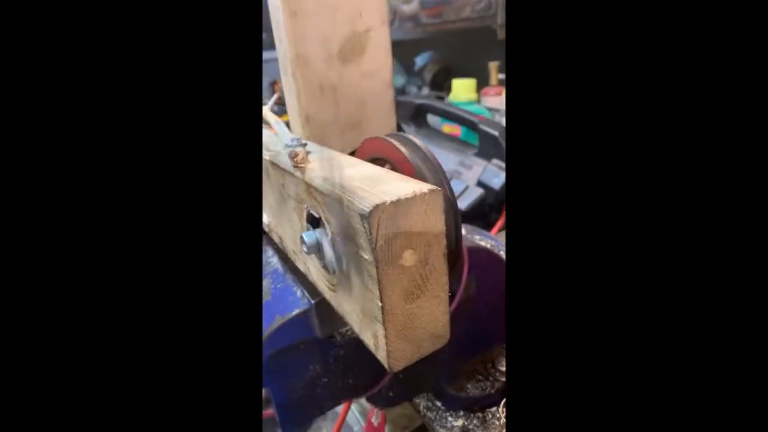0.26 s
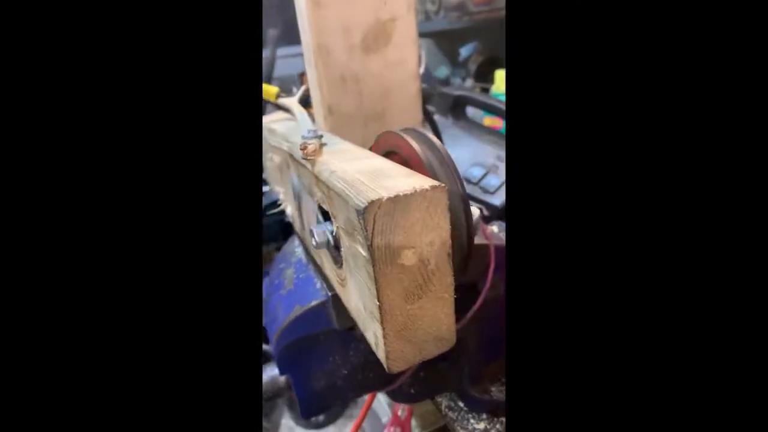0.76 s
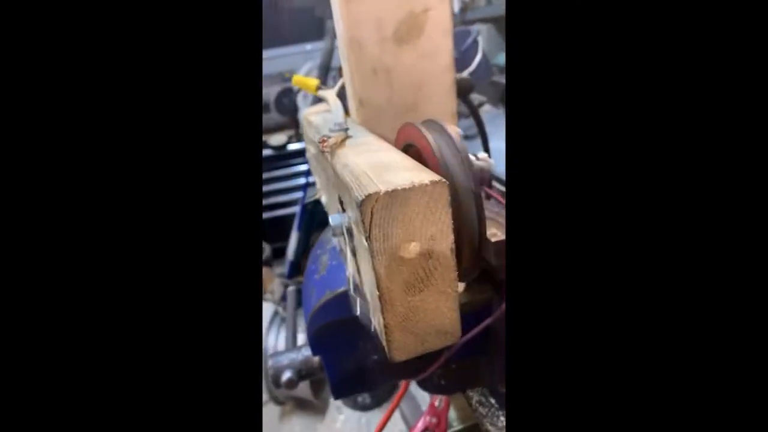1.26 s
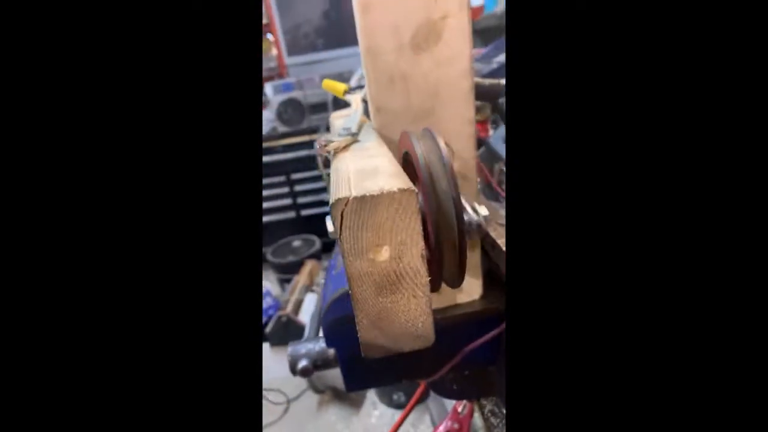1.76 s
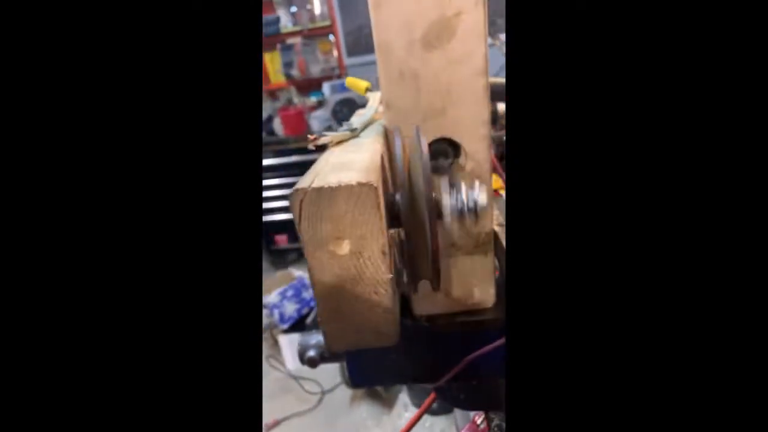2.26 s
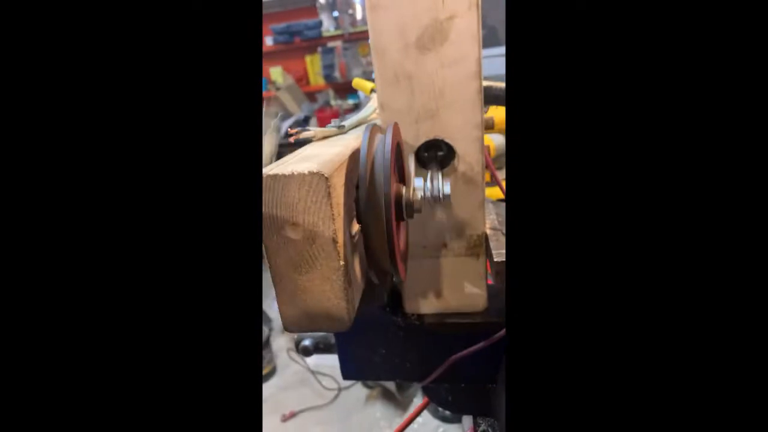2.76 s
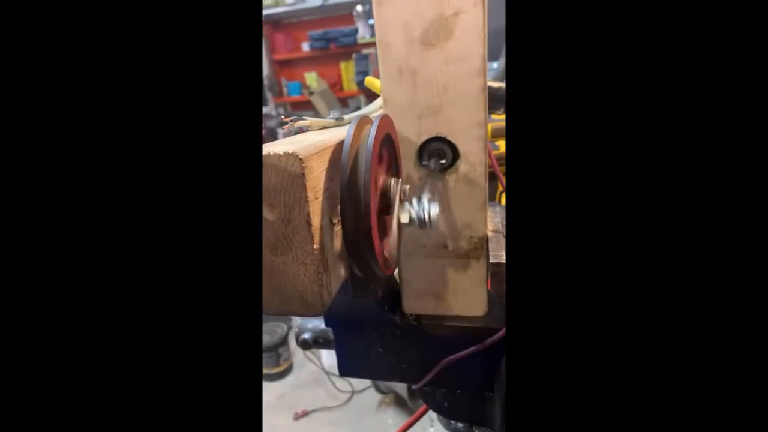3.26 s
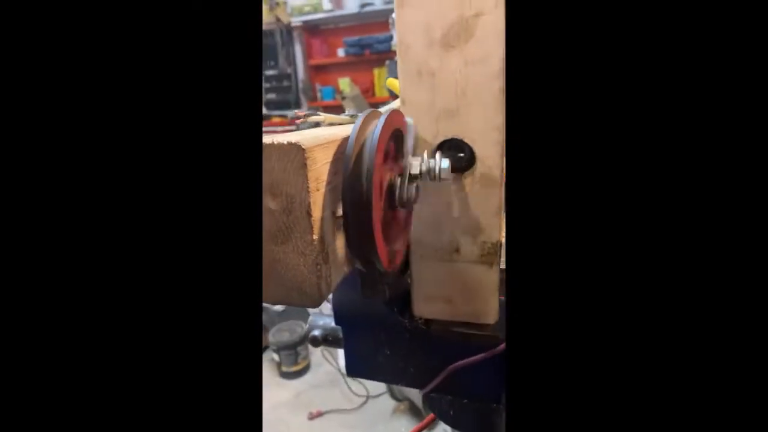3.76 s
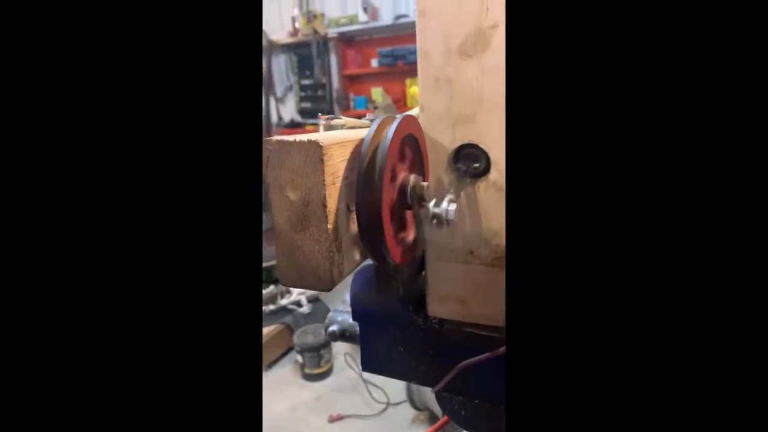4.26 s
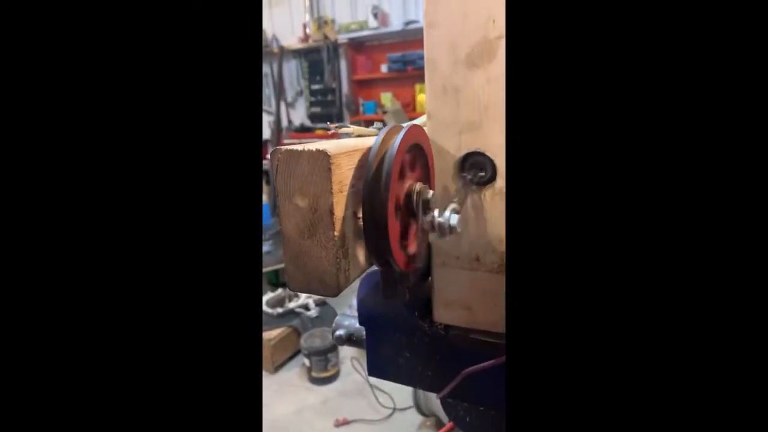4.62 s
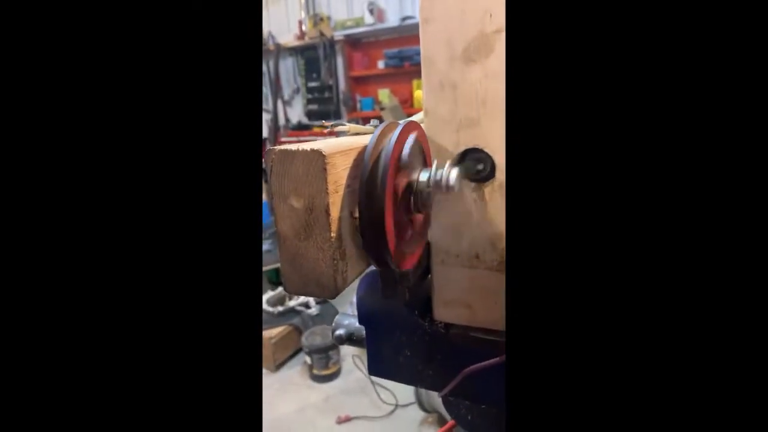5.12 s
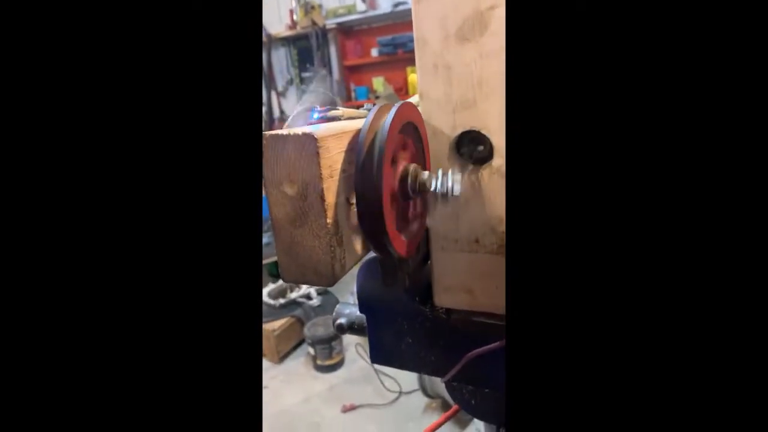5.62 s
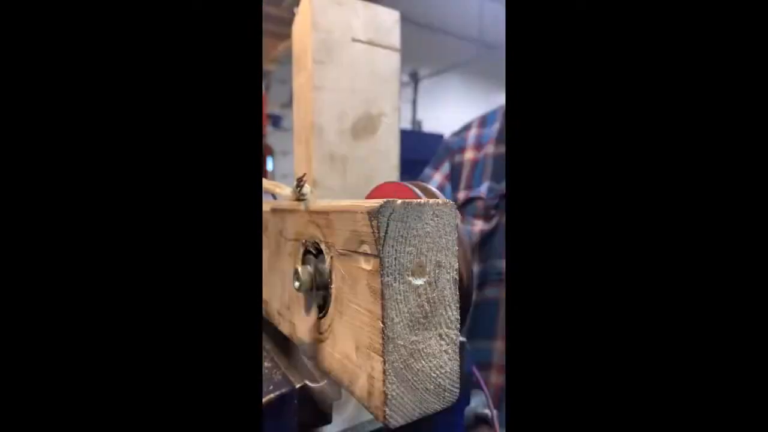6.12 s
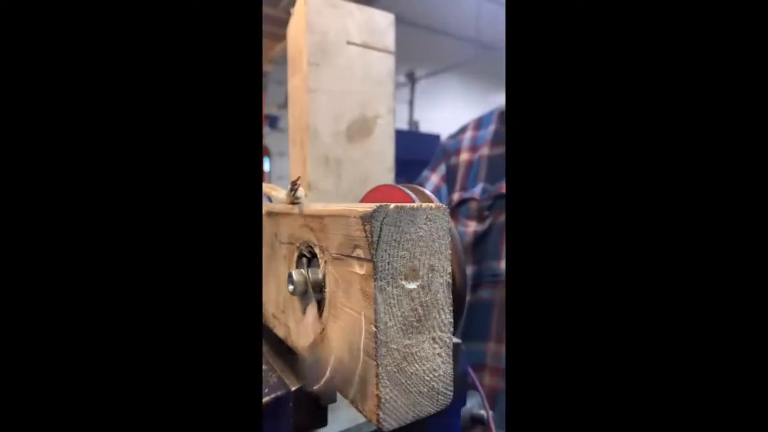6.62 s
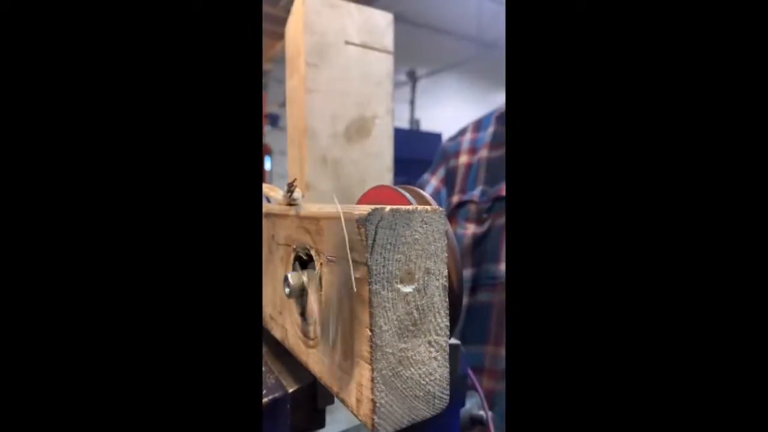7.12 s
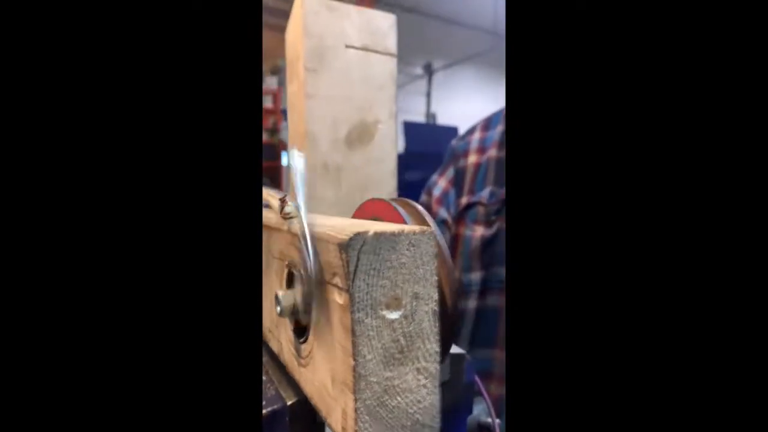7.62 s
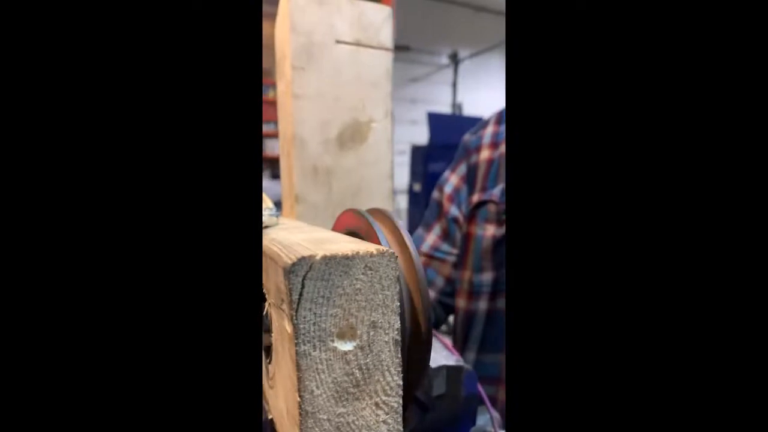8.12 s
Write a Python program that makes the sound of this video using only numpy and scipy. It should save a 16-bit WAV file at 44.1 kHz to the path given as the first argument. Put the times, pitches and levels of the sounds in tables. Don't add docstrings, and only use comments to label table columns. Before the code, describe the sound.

A homemade solenoid engine runs in a workshop, very close to a handheld stereo microphone. Each stroke is a hard woody, metallic clack, followed at once by a loose crank knock, a short sliding rattle and a light return tick. About five strokes a second continue for six seconds, then after a tiny silent gap the clacking resumes slightly faster and with more low frame thump.

```python
import sys
import numpy as np
from scipy import signal
from scipy.fft import rfft, irfft, next_fast_len
from scipy.io import wavfile
from scipy.ndimage import uniform_filter1d

SR = 44100
rng = np.random.default_rng(int(sys.argv[2]) if len(sys.argv) > 2 else 0)


def convert_level_to_amplitude(level_db):
    exponent = np.asarray(level_db, float) / 20
    return 10 ** exponent


def waveform_to_disk(signal):
    frames = np.transpose(np.atleast_2d(signal))
    scaled = np.clip(frames, -1, 1) * 32767
    samples = np.round(scaled).astype(np.int16)
    wavfile.write(sys.argv[1], SR, samples)


N = 369558

# (time [s], blow [dB], knock [dB], chatter [dB], pin ring [dB])
STROKES_CONTACT_SIDE = [(.0443, -0.5, 3, -1.5, -30), (.2361, -1, 5.5, -4, -29), (.426, 0, -1, -2, -29),
                        (.6233, 0.5, 4, -5.5, -19.5), (.8187, 1, 5, -3.5, -27), (1.0127, -2, -7, -0.5, -21),
                        (1.2054, -2, -3, -3.5, -19), (1.397, 0, 1.5, -4.5, -22),
                        (1.5914, -0.5, -1.5, -1, -24), (1.7825, -1, -3.5, -4.5, -33.5),
                        (1.9761, -0.5, 3.5, -6.5, -31), (2.169, -0.5, 6, -8, -22),
                        (2.3588, 0.5, 0, -5.5, -28), (2.5534, -2, 3, -3.5, -19),
                        (2.7466, 0, 3.5, -4.5, -23), (2.9423, 0.5, -1, 0, -22)]
# (time [s], blow [dB], knock [dB], chatter [dB], pin ring [dB])
STROKES_WHEEL_SIDE = [(3.137, 1.5, 4, -3, -16), (3.3318, -0.5, -7, -4, -27), (3.5256, 2.5, -3, -5.5, -23),
                      (3.7205, -1, -3, -3.5, -23), (3.915, -4, 4.5, -4.5, -15),
                      (4.1014, 0, -16, -10.5, -18), (4.294, -1.5, -1, -3.5, -31),
                      (4.4845, 1.5, 1.5, -6, -24), (4.6744, 0.5, -4, -3, -17), (4.862, 1, -4, -7.5, -24),
                      (5.0585, 1.5, -7, -7.5, -26), (5.252, -3.5, -0.5, -5.5, -25),
                      (5.441, 1.5, -2.5, -10.5, -16.5), (5.6327, -1.5, 8, -5.5, -19),
                      (5.8237, 0, 1, -6.5, -21), (6.0193, -1.5, -5, -6, -17)]
# (time [s], blow [dB], knock [dB], chatter [dB], pin ring [dB])
STROKES_CLOSE = [(6.239, -1.5, -3, -4, -30), (6.4105, 0, 0.5, -9, -26), (6.582, 2.5, 0, -8.5, -39),
                 (6.7529, -0.5, -13, -4, -31), (6.9282, 0, -4.5, -6, -30), (7.1003, 0.5, 2.5, -8, -27),
                 (7.2761, 2, 3.5, -6.5, -28), (7.4453, -0.5, -6, -4, -33), (7.6205, -0.5, -5, -5.5, -28.5),
                 (7.797, 3.5, 3.5, -8.5, -26), (7.9741, 3.5, -4.5, -3.5, -36), (8.1531, 2.5, 1.5, -5, -28),
                 (8.3258, 1.5, -4, -5.5, -37)]
# (tick time [s], tick [dB], slide [dB])
RETURNS_CONTACT_SIDE = [(.1733, -3.5, -20.5), (.3676, 0, -17), (.56, -1.5, -19.5), (.7586, 5, -18),
                        (.9518, 2, -19.5), (1.1417, -5.5, -18.5), (1.3355, 2.5, -14.5), (1.532, -1.5, -20),
                        (1.7224, 2, -16.5), (1.9153, 1.5, -20.5), (2.1097, -2.5, -19), (2.2987, 1, -18.5),
                        (2.4931, 2.5, -20), (2.6868, 0.5, -17), (2.8816, 0.5, -22), (3.0744, -1.5, -17)]
# (tick time [s], tick [dB], slide [dB])
RETURNS_WHEEL_SIDE = [(3.2713, 2, -18), (3.4636, -1, -22), (3.6596, 1, -24), (3.8552, 3, -22),
                      (4.043, -14, -18), (4.2328, -7, -28), (4.4235, -4, -22.5), (4.6132, -6, -27),
                      (4.803, -0.5, -20), (4.996, -2.5, -26), (5.1892, -5, -22.5), (5.3785, -3, -17.5),
                      (5.5691, -9.5, -23), (5.762, -20, -18.5), (5.9568, -0.5, -20), (6.148, 6, -21.5)]
# (tick time [s], tick [dB], slide [dB])
RETURNS_CLOSE = [(6.3437, -6.5, -26), (6.515, -7.5, -23.5), (6.6802, -0.5, -24.5), (6.855, -6.5, -23),
                 (7.0293, -1.5, -23), (7.2118, -9, -23.5), (7.378, -1.5, -24.5), (7.5532, -3, -24.5),
                 (7.7357, -1.5, -26.5), (7.9129, -3.5, -22.5), (8.092, 3.5, -25.5), (8.27, -10.5, -20.5),
                 (8.37, -15, -25)]
TURNS = np.hstack([STROKES_CONTACT_SIDE + STROKES_WHEEL_SIDE + STROKES_CLOSE,
                   RETURNS_CONTACT_SIDE + RETURNS_WHEEL_SIDE + RETURNS_CLOSE])

# (time after blow or tick [s], wood [dB], link [dB], bare steel [dB], spread [dB])
CYCLE_CONTACT_SIDE = [
    (-.009, -61, -32.5, -35, 4),
    (0, -15.5, -12, -13, 0.16),
    (0.024, -38, -33, -29, 2),
    (.0225, -28.5, -21.5, -9.5, 1),
    (0, -38, -39.5, -26, 2),
]
# (time after blow or tick [s], wood [dB], link [dB], bare steel [dB], spread [dB])
CYCLE_WHEEL_SIDE = [
    (-.009, -77, -35, -59, 5.2),
    (0, -14.5, -13, -13.5, 1.67),
    (.014, -39, -22, -27, 4),
    (.0222, -30.5, -20.5, -11, 2.5),
    (0, -37, -43, -25.5, 2.2),
]
# (time after blow or tick [s], wood [dB], link [dB], bare steel [dB], spread [dB])
CYCLE_CLOSE = [
    (-0.0095, -65, -62, -33, 9),
    (0, -22, -16, -23, 1.26),
    (.0125, -40, -27, -15, 1.8),
    (.0235, -29.5, -18, -18, 1.8),
    (0, -38.5, -38.5, -27.5, 4.1),
]
BOUNCE_PER_CHATTER = -0.62
STEEL_FOLLOWS_KNOCK = 0.24
WANDER_S = .0004

# (time after blow [s], level [dB])
CHATTER = [(-.01, -60), (-.008, -43), (-.002, -27), (.003, -19), (.024, -17), (.038, -35), (.078, -49)]
# (time after blow [s], level [dB])
SLIDE = [(.02, -42), (.04, -19), (.065, -13), (.09, -23), (.125, -35.5), (.17, -29.5)]

# (frequency [Hz], level [dB], t60 [s])
WOOD = [(292.5, -10.5, 0.082), (377.7, -15.5, 0.059), (474, -13.5, 0.023), (654.3, 0, 0.039),
        (676, -4, 0.035), (940, -2.5, 0.038), (1001, -6, 0.038), (1131, -11.5, 0.043)]
# (frequency [Hz], level [dB], t60 [s])
LINK = [(1550, 0, 0.037), (1774, -6, 0.037), (1958, 1.5, .035), (1994, -2.5, 0.025), (2270, -15, 0.035)]
# (frequency [Hz], level [dB], t60 [s])
CRANK = [(2850, -6, .025), (3300, 0, .035), (3440, -3, .03), (3630, -3, .03), (3900, -3, .025),
         (4300, -5, .025)]
# (frequency [Hz], level [dB], t60 [s])
STEEL = [(7440, -54, 0.059), (8360, 6, 0.026), (9980, 8, 0.012), (11400, 2, 0.014)]
# (frequency [Hz], level [dB], t60 [s])
PIN = [(14178, 0, .2), (14200, -4, .15), (14388, -4, .15), (14416, 0, .2), (14765, -1, .11),
       (14966, -2, .11)]
# (frequency [Hz], level [dB], t60 [s])
FRAME = [(74.4, 0, 0.18), (106.3, 0, 0.39)]

# (frequency [Hz], density [dB/Hz])
WOOD_CRACK = [(60, -88), (150, -30), (270, -8.5), (600, -1), (1300, -3), (2500, -41.5)]
# (frequency [Hz], density [dB/Hz])
LINK_CRACK = [(900, -33), (1600, 13), (2100, 18.5), (2700, -28)]
# (frequency [Hz], density [dB/Hz])
CRANK_CRACK = [(2000, -11), (2800, -9.5), (3700, 2), (5000, 0.5), (6500, -15.5)]
# (frequency [Hz], density [dB/Hz])
STEEL_CRACK = [(3000, -2), (5000, -3.5), (8000, 0.5), (11000, 2), (13000, 0), (15000, 1), (16500, -2)]

# (time [s], link [dB], wood [dB], frame [dB])
FACING = [
    (0, 5, 2.5, -10),
    (2.3, 5, 4.5, -10),
    (3, -0.5, 0, -8.5),
    (6.1, -2, 0.5, -11),
    (6.2, -1, -1.5, 0.5),
    (8.38, -2.6, 0, -4),
]
# (time [s], level [dB])
JOIN = [
    (6.122, 1.5),
    (6.126, -17.5),
    (6.142, -55),
    (6.146, -73),
    (6.153, -65),
    (6.159, -31),
    (6.171, 4.5),
]

# (frequency [Hz], density [dB/Hz])
SHOP = [(30, 6), (100, -1.5), (300, -0.5), (640, -5), (1240, -12.5), (3500, -3.5), (11000, -21.5),
        (15000, -27)]
SHOP_DB = -51.5
HUM_HZ, HUM_DB = 179, -59
# (frequency [Hz], t60 [s])
ROOM = [(100, 0.38), (2500, 0.2), (15000, 0.11)]

# (frequency [Hz], phase beyond the lag [rad], left minus right [dB], likeness [0-1])
PORTS = [(60, .3, -2.4, .84), (650, -.5, -1.5, .84), (900, -.9, 4.5, .7), (1400, -1.8, 0, .5),
         (1900, -1.6, -2, .7), (2350, -1, 0, .25), (3500, -3.1, 0, .72), (4800, -2.8, 0, .88),
         (6000, -2.6, 0, .55), (8800, -2, 0, .9), (10300, -1.6, 0, .62), (13200, -1.1, 0, .9),
         (15000, -.6, 0, .75), (16500, -2.3, 0, .7)]
LAG_S = 9 / SR


def engine(struck):
    chatter = after_strokes(CHATTER, column=3)
    slide = after_strokes(SLIDE, column=7)

    wood_blow = convert_level_to_amplitude(19.0) * blows(struck, column=1, decay_s=0.0026, firm=1.4)
    link_blow = convert_level_to_amplitude(17.5) * blows(struck, column=2, decay_s=0.0047, firm=0.73)
    steel_blow = convert_level_to_amplitude(17.5) * blows(struck, column=3, decay_s=0.0029, firm=0.35)

    wood_rub = rattle(1500, 3.4) * (convert_level_to_amplitude(-5) * chatter + convert_level_to_amplitude(-4.5) * slide)
    link_rub = rattle(2500, 2.03) * (convert_level_to_amplitude(-3.5) * chatter + convert_level_to_amplitude(-2.5) * slide)
    steel_rub = rattle(5000, 3.8) * (convert_level_to_amplitude(-1.5) * chatter + convert_level_to_amplitude(-2.5) * slide)

    wood = part(wood_blow, wood_rub, WOOD, WOOD_CRACK,
                crack_db=-10.5, rub_ring_db=-7.5, rise_s=0.0022, slack=0.0073)
    link = part(link_blow, link_rub, LINK, LINK_CRACK,
                crack_db=-10, rub_ring_db=-6.0, rise_s=0.00076, slack=0.025)
    crank = part(link_blow, link_rub, CRANK, CRANK_CRACK,
                 crack_db=3.0, rub_ring_db=-12, rise_s=0.001, slack=0.02)
    steel = part(steel_blow, steel_rub, STEEL, STEEL_CRACK,
                 crack_db=10, rub_ring_db=-22, rise_s=0.00078, slack=0.017)
    return (facing(column=2) * wood + convert_level_to_amplitude(-7.5) * facing(column=1) * link
            + convert_level_to_amplitude(-3) * crank + convert_level_to_amplitude(-9.5) * steel)


def hits():
    s, blow_db, knock_db, chatter_db, pin_db, tick_s, tick_db, slide_db = TURNS.T
    turns_per_view = [len(STROKES_CONTACT_SIDE), len(STROKES_WHEEL_SIDE), len(STROKES_CLOSE)]
    cycle = np.repeat([CYCLE_CONTACT_SIDE, CYCLE_WHEEL_SIDE, CYCLE_CLOSE], turns_per_view, axis=0)
    delay_s, force_db, spread_db = cycle[..., 0], cycle[..., 1:4], cycle[..., 4:]
    chance = rng.standard_normal(cycle.shape)

    at_s = np.transpose([s, s, s, s, tick_s]) + delay_s
    at_s += WANDER_S * chance[..., 0] * (delay_s != 0)

    bounce_db = BOUNCE_PER_CHATTER * (chatter_db - chatter_db.mean())
    own_db = np.transpose([0 * s, blow_db, bounce_db, knock_db, tick_db])
    level_db = force_db + own_db[..., None] + spread_db * chance[..., 1:4]
    level_db[:, -2, -1] -= (1 - STEEL_FOLLOWS_KNOCK) * knock_db
    return np.column_stack([at_s.ravel(), level_db.reshape(at_s.size, -1)])


def blows(struck, column, decay_s, firm):
    t, out = np.arange(600) / SR, np.zeros(N)
    shape = (1 - np.exp(-t / 0.00059)) * np.exp(-t / decay_s)
    force = rng.standard_normal((len(struck), len(t))) * shape / np.linalg.norm(shape)
    force[:, 20] += firm
    for row, burst in zip(struck, force):
        add(out, row[0], convert_level_to_amplitude(row[column]) * burst / np.linalg.norm(burst))
    return out


def rattle(per_s, spread_db):
    clumps = evened(smooth_twice(rng.standard_normal(N), 150))
    size_db = spread_db * (np.minimum(rng.exponential(1, N), 4) + 0.99 * clumps)
    touches = rng.random(N) < per_s / SR
    return evened(touches * rng.standard_normal(N) * convert_level_to_amplitude(size_db))


def after_strokes(shape, column, follow=1):
    s, db = np.transpose(shape)
    t, out = np.arange(s[0], s[-1], 1 / SR), np.zeros(N)
    shape_db = np.interp(t, s, db)
    for row in TURNS:
        add(out, row[0] + s[0], convert_level_to_amplitude(follow * row[column] + shape_db))
    return out


def part(blow, rub, modes, points, crack_db, rub_ring_db, rise_s, slack):
    stroke = np.searchsorted(TURNS[:, 0] - .02, np.arange(N) / SR)
    seat = rng.integers(0, 3, len(TURNS) + 1)[stroke]
    out = convert_level_to_amplitude(crack_db) * signal.oaconvolve(blow + rub, crack(points))
    drive = blow + convert_level_to_amplitude(rub_ring_db) * rub
    shifts = 1 + slack * rng.standard_normal((3, len(modes)))
    for k, shift in enumerate(shifts):
        retuned = [(hz * ratio, db, t60_s) for (hz, db, t60_s), ratio in zip(modes, shift)]
        out += signal.oaconvolve(drive * (seat == k), ring(retuned, 2048 / SR, rise_s))
    return out[:N]


def ring(modes, seconds, rise_s=0.0011):
    t = np.arange(round(seconds * SR)) / SR
    h = sum(convert_level_to_amplitude(db - 60 * t / t60_s) * np.sin(2 * np.pi * hz * t) for hz, db, t60_s in modes)
    h = h * (1 - np.exp(-t / rise_s))
    return h / np.linalg.norm(h)


def crack(points):
    hz = abs(np.fft.fftfreq(4096, 1 / SR))
    log_gain = np.log(convert_level_to_amplitude(read(points, hz)))
    h = np.fft.ifft(np.exp(np.conj(signal.hilbert(log_gain)))).real[:2048]
    return h / np.linalg.norm(h)


def pin():
    touch = after_strokes([(.004, 3), (.025, 2), (.07, -3), (.15, -22.5)], column=4)
    out = np.zeros(N)
    for mode in PIN:
        touches = touch * rattle(150, 5.6)
        out += convert_level_to_amplitude(mode[1]) * signal.oaconvolve(touches, ring([mode], .3))[:N]
    return convert_level_to_amplitude(-19.0) * out


def frame():
    push = after_strokes([(.003, -45), (.02, -3), (.032, -4), (.038, -48)], column=3, follow=0.23)
    push = push - uniform_filter1d(push, size=900)
    push = push * (1 + 2.3 * uniform_filter1d(rng.standard_normal(N), size=300))
    return convert_level_to_amplitude(-37.5) * facing(column=3) * signal.oaconvolve(push, ring(FRAME, 0.17))[:N]


def facing(column):
    columns = np.transpose(FACING)
    return convert_level_to_amplitude(np.interp(np.arange(N) / SR, columns[0], columns[column]))


def room(x):
    taps = rng.standard_normal((2, SR // 2))
    taps[:, :round(.004 * SR)] = 0
    hz, t, z = signal.stft(taps, SR, nperseg=256)
    decay = convert_level_to_amplitude(-60 * t / read(ROOM, hz)[:, None])
    tail = signal.istft(z * decay, SR, nperseg=256)[1]
    return signal.oaconvolve(x[None], tail / np.linalg.norm(tail[0]), axes=1)[:, :N]


def shop():
    hz = np.fft.rfftfreq(N, 1 / SR)
    tone = irfft(rfft(rng.standard_normal((2, N))) * convert_level_to_amplitude(read(SHOP, hz)), N)
    waver = evened(smooth_twice(rng.standard_normal(N), 2500))
    hum = (1 + 0.87 * waver) * np.sin(2 * np.pi * HUM_HZ * np.arange(N) / SR)
    return convert_level_to_amplitude(SHOP_DB) * evened(tone) + convert_level_to_amplitude(HUM_DB) * hum


def ports(x, other):
    size = next_fast_len(N + 512)
    hz = np.fft.rfftfreq(size, 1 / SR)
    f, *columns = np.transpose(PORTS)
    turn_rad, left_db, same = (np.interp(hz, f, c) for c in columns)
    heard = same * rfft(x, size) + np.sqrt(1 - same ** 2) * rfft(other, size)
    delay = np.exp(-1j * (2 * np.pi * hz * LAG_S + turn_rad))
    right = irfft(heard * convert_level_to_amplitude(-left_db) * delay, size)[:N]
    return np.array([x, right])


def evened(x):
    return x / np.sqrt(np.mean(x ** 2) + 1e-20)


def smooth_twice(x, size):
    return uniform_filter1d(uniform_filter1d(x, size=size), size=size)


def read(points, hz):
    f, value = np.transpose(points)
    return np.interp(np.log(hz + 1), np.log(f + 1), value)


def add(mix, s, sound):
    span = mix[round(s * SR):][:len(sound)]
    span += sound[:len(span)]


def scene():
    small = signal.butter(2, 215, "highpass", fs=SR, output="sos")
    struck = hits()
    machine, aside = signal.sosfilt(small, [engine(struck) + pin(), engine(struck)])
    front, flank = convert_level_to_amplitude(-12.5) * room(machine) + shop()
    return ports(machine + frame() + front, aside + flank)


def low_pass(x):
    return signal.sosfilt(signal.butter(12, 16810, fs=SR, output="sos"), x)


def record(dry):
    fade = convert_level_to_amplitude(np.interp(np.arange(N) / SR, *np.transpose(JOIN)))
    x = signal.sosfilt(signal.butter(3, 65, "highpass", fs=SR, output="sos"), dry * fade)
    x = 1.05 * np.tanh(x / 1.05)
    edge_hz = [0, 15620, 15980, 16700, 16900, SR / 2]
    edge = signal.firwin2(401, edge_hz, convert_level_to_amplitude([0, 0, -28, -30, -80, -80]), fs=SR)
    return low_pass(signal.oaconvolve(x, edge[None], "same"))


dry = scene()
out = record(dry)
waveform_to_disk(out)
```